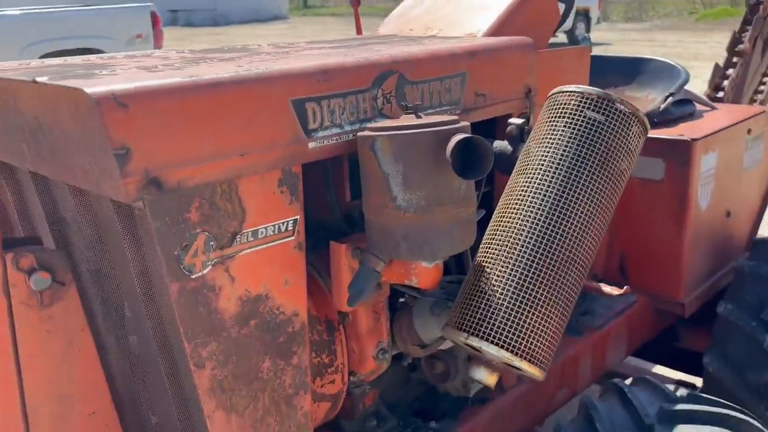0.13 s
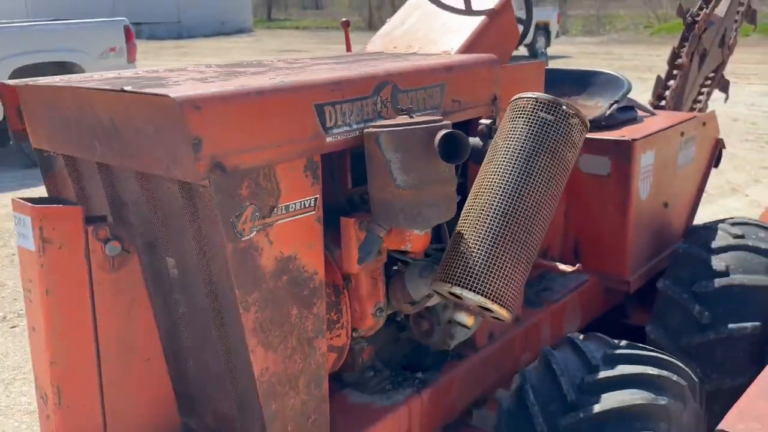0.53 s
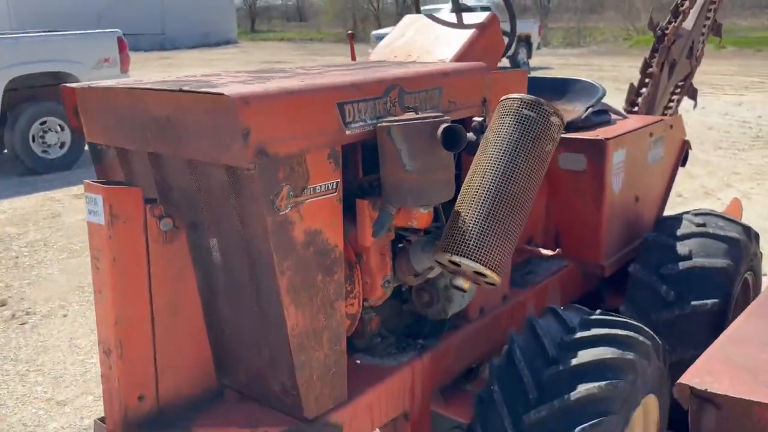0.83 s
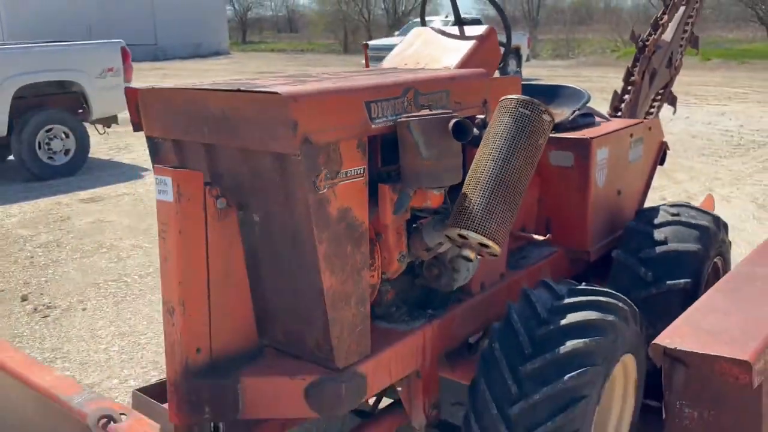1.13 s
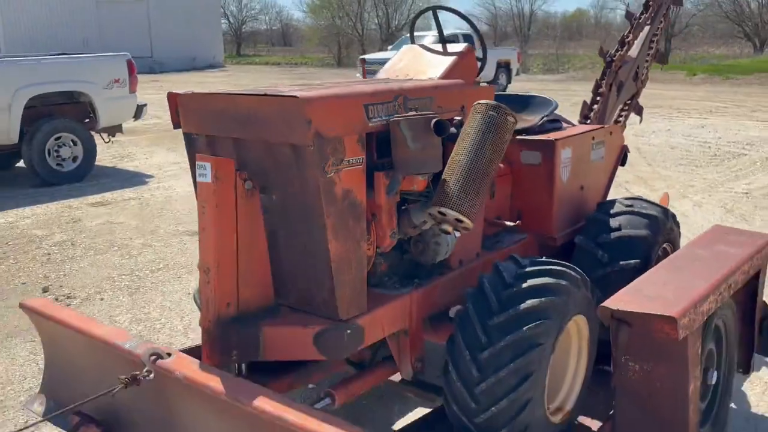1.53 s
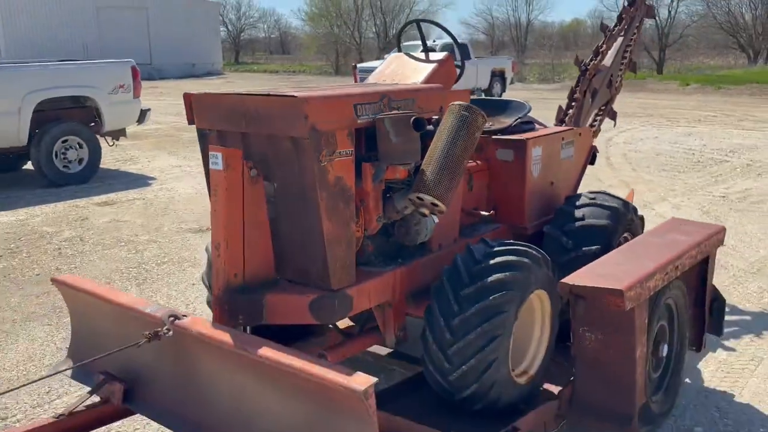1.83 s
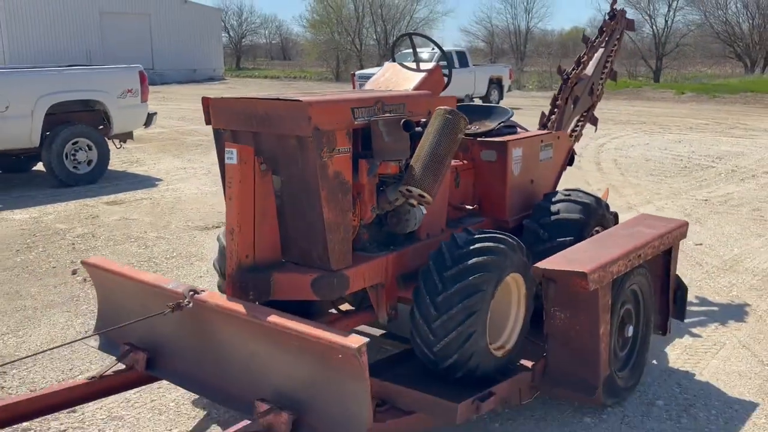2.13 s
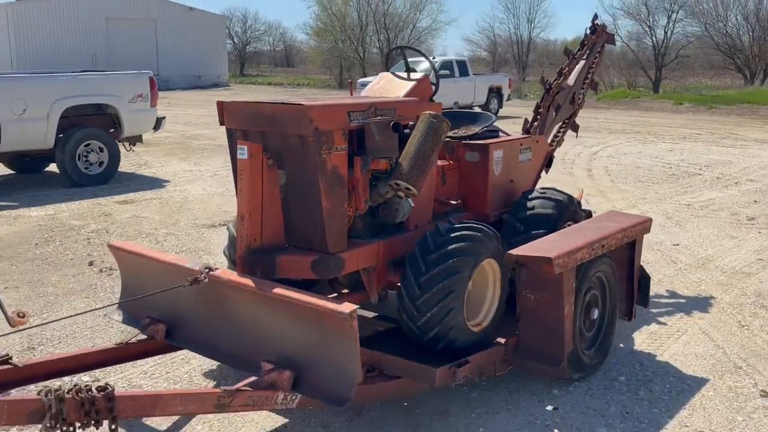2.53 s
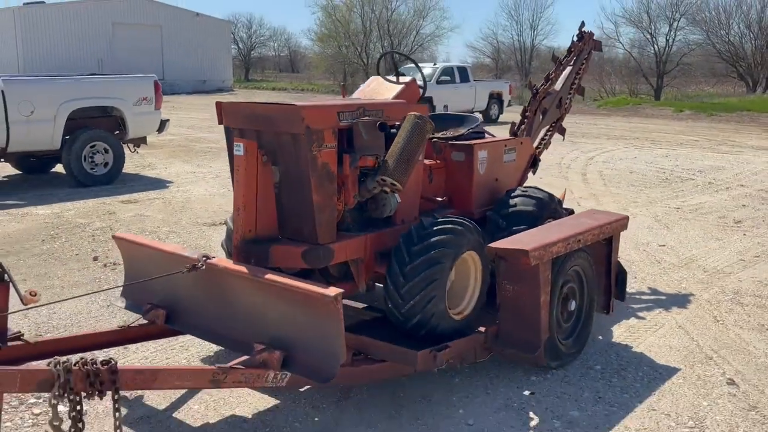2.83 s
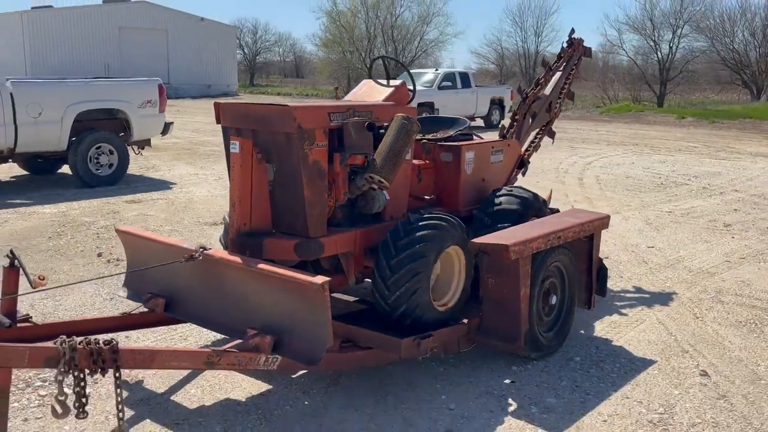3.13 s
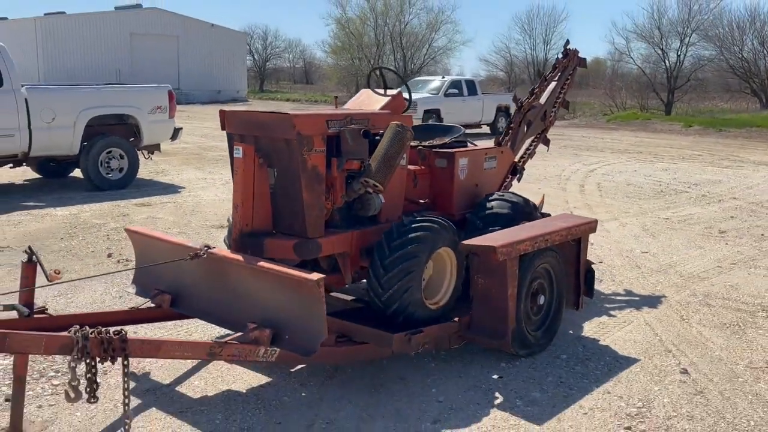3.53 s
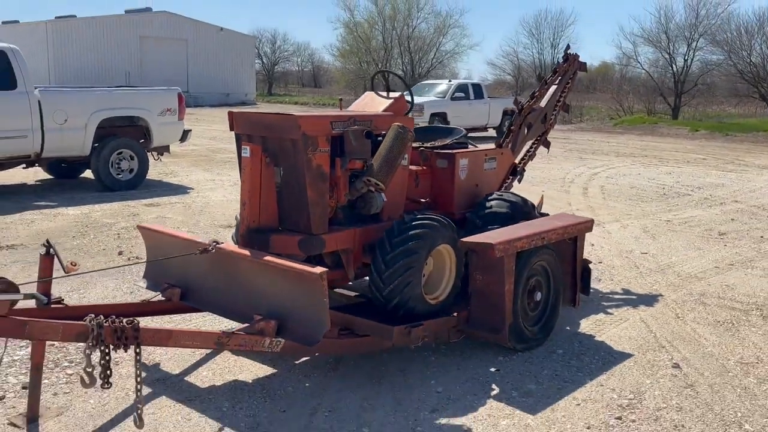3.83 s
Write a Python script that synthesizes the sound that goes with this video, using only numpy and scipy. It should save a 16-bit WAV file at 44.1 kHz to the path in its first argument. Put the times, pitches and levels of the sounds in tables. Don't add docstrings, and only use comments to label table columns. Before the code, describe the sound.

A four-cylinder petrol engine idles with clattering valves and puffing exhaust, fading amid wind buffeting

```python
import sys
import numpy as np
from scipy import signal
from scipy.fft import rfft, irfft
from scipy.io import wavfile
from scipy.ndimage import uniform_filter1d

SR = 44100
rng = np.random.default_rng(int(sys.argv[2]) if len(sys.argv) > 2 else 0)


def put_to_file(sound):
    columns = np.atleast_2d(sound).T
    safe = np.clip(columns, -1, 1)
    whole_steps = np.round(safe * 32767)
    wavfile.write(sys.argv[1], SR, whole_steps.astype(np.int16))


def invert_db(level):
    return 10 ** (np.asarray(level, dtype=float) / 20)


N = 176400
CYCLE_HZ = 16.47


def evened(x):
    return x / np.sqrt(np.mean(x ** 2) + 1e-20)


def read(points, hz):
    f, value = np.transpose(points)
    return np.interp(np.log(hz + 1), np.log(f + 1), value)


def curve(points, column=1):
    rows = np.transpose(points)
    return np.interp(np.arange(N) / SR, rows[0], rows[column])


def add(mix, at, sound):
    mix[at:at + len(sound)] += sound


def noise(spectrum, count=3):
    patch_db = 1.62
    hz, _, z = signal.stft(rng.standard_normal((count, N)), SR, nperseg=512)
    luck = rng.standard_normal(z.shape[1:])
    patches = uniform_filter1d(luck, size=4, axis=0)
    patches = evened(uniform_filter1d(patches, size=8, axis=1))
    patchy = signal.istft(z * invert_db(patch_db * patches), SR, nperseg=512)[1][:, :N]
    colour = invert_db(read(spectrum, np.fft.rfftfreq(N, 1 / SR)))
    return evened(irfft(rfft(patchy) * colour, N))


def slow_noise(first, second):
    smooth = uniform_filter1d(rng.standard_normal(N), size=first)
    return evened(uniform_filter1d(smooth, size=second))


def resonate(x, hz, width):
    pole = np.exp((2j * np.pi * hz - np.pi * width) / SR)
    return 2 * signal.lfilter([1 - abs(pole)], [1, -pole], x).real


# frequency in Hz, phase in rad.
PORT_PHASE = [(0, 0), (2070, .4), (2670, 1.3), (3360, .5), (4400, 0), (5510, -.7), (6600, -.1), (7100, 0)]
# frequency in Hz, left over right in dB.
PORT_BALANCE = [(60, 0), (290, -.4), (630, -1.5), (1390, -3.2), (3040, 1), (5500, 1.4), (8000, 0),
                (16000, 0)]
# frequency in Hz, level in dB.
APART = [(60, -8), (1000, -7), (3000, -6), (5500, -6), (6800, -9), (16000, -7.5)]


def ports(three):
    turn_from_hz, half_turn_hz = 7150, 2840
    three = np.pad(three, ((0, 0), (2048, 2048)), "reflect")
    hz = np.fft.rfftfreq(three.shape[1], 1 / SR)
    turn = read(PORT_PHASE, hz) - np.pi * np.maximum(hz - turn_from_hz, 0) / half_turn_hz
    half = np.exp(.5j * turn) * invert_db(read(PORT_BALANCE, hz) / 2)
    z = rfft(three)
    shared = z[0] * np.array([half, 1 / half])
    return irfft(shared + invert_db(read(APART, hz)) * z[1:], three.shape[1])[:, 2048:-2048]


# time in seconds,
# peak in dB, pitch in Hz.
BUFFETS = [(0.007, -7, 136), (0.032, -6.5, 163), (0.055, -13, 145), (0.096, -8.5, 195), (0.123, -3, 140),
           (0.163, -5.5, 126), (0.188, -5.5, 96), (0.228, -15, 183), (0.281, -14, 160), (0.359, -8, 131),
           (0.469, -19, 145), (0.483, -14.1, 154), (0.542, -6.5, 172), (0.584, -8, 215),
           (0.607, -12.6, 118), (0.628, -10, 144), (0.654, -13, 112), (0.715, -21, 135),
           (0.816, -14.3, 156), (0.831, -12.5, 127), (0.855, -11, 143), (0.895, -9, 166), (0.952, -22, 160),
           (0.992, -12.5, 91), (1.133, -10.3, 127), (1.159, -14.4, 104), (1.196, -16, 120),
           (1.216, -9, 100), (1.26, -8, 158), (1.301, -5, 149), (1.445, -11, 133), (1.517, -16, 195),
           (1.553, -15.1, 126), (1.622, -20, 113), (1.791, -12, 126), (1.854, -17.5, 144),
           (1.868, -13.5, 123), (2.071, -14, 113), (2.114, -22.5, 113), (2.186, -12, 129), (2.23, -21, 148),
           (2.25, -14, 143), (2.301, -11.5, 96), (2.316, -14, 137), (2.401, -20, 126), (2.5, -9.5, 105),
           (2.532, -14, 125), (2.561, -11.5, 117), (2.576, -20, 128), (2.597, -7, 132), (2.764, -9.5, 137),
           (2.781, -15.5, 126), (2.838, -18, 131), (2.878, -16.5, 174), (3.07, -15, 335), (3.099, -14, 318),
           (3.142, -16.5, 177), (3.57, -21, 291), (3.749, -22.5, 141), (3.993, -22.5, 134)]


def buffets():
    cycles, level_db, lull_depth = 2.14, -1, .8
    slaps, near = np.zeros((2, N + 6000))
    t = np.arange(-1500, 1500) / SR
    for s, db, hz in BUFFETS:
        shape = np.exp(-(t * hz / cycles * 3) ** 2)
        add(slaps, round(s * SR), invert_db(db + level_db) * shape * np.cos(2 * np.pi * hz * t))
        add(near, round(s * SR), shape)
    lull = 1 - lull_depth * np.minimum(near[1500:N + 1500], 1)
    return slaps[1500:N + 1500], lull


# start in seconds, length in seconds, level in dB, pitch in Hz.
PATS = [
    (3.052, 0.028, -23, 387),
    (3.076, 0.03, -27.5, 430),
    (3.111, 0.06, -35, 300),
    (3.21, 0.09, -32.5, 483),
    (3.264, 0.044, -35.5, 310),
    (2.899, .12, -33, 300),
    (3.371, 0.0149, -30.5, 300),
    (3.556, 0.026, -32.5, 450),
    (3.599, 0.031, -33, 600),
    (3.77, 0.13, -34, 825),
]


def port_puffs():
    out = np.zeros((3, N))
    for s, length, db, hz in PATS:
        at, count = round(s * SR), round(length * SR)
        breath = resonate(rng.standard_normal((3, 9000)), hz, 0.5 * hz)
        breath = evened(resonate(breath, hz, 0.74 * hz))[:, -count:]
        rise_and_fall = np.sin(np.pi * (np.arange(count) / count) ** 0.6)
        out[:, at:at + count] += invert_db(db) * breath * rise_and_fall
    return out


# time in seconds, level in dB.
GUST = [(0, -11.5), (.17, -17), (.4, -18), (.75, -22), (1.3, -21.5), (1.55, -22.5), (1.9, -29),
        (2.15, -23.5), (2.3, -20.5), (2.6, -24), (2.8, -24), (2.9, -30), (3.3, -30.5), (3.5, -33),
        (3.9, -32), (4, -27.5)]
# frequency in Hz, level in dB per Hz.
WIND = [(20, -42), (35, -17.5), (65, 1), (120, -1.5), (200, -7.5), (330, -13), (600, -24.5), (1500, -78)]
# time in seconds, level in dB.
FLUTTER_LEFT = [(0, -0.5), (3.3, 0), (3.45, -4), (3.62, -2), (3.7, -13), (4, -21)]


def wind():
    lump_db, flutter_hz = 2, 192
    stir_db, stir_ms, stir_reach_s = 4, 39, 2.2
    lumps = slow_noise(1200, 900)
    slaps, lull = buffets()
    t = np.arange(N) / SR
    beat = np.cos(2 * np.pi * CYCLE_HZ * (t - stir_ms / 1000))
    air = noise(WIND) * invert_db(stir_db * np.maximum(1 - t / stir_reach_s, 0) * beat)
    low = irfft(rfft(air) / (1 + (np.fft.rfftfreq(N, 1 / SR) / flutter_hz) ** 6), N)
    rumble = low + invert_db(curve(FLUTTER_LEFT)) * (air - low)
    strength = invert_db(curve(GUST) - 0.5 + lump_db * lumps)
    return strength * rumble * lull + slaps * [[1], [.25], [-.25]] + port_puffs()


# time in seconds, lag in ms.
LAG = [(0, 0.46), (.6, -0.35), (1.05, -0.95), (1.8, 1.87), (2.6, 1.21), (3.0, 0.56), (4, -0.68)]


def train(ms, db, spread_db, jitter_s):
    luck = np.clip(rng.standard_normal((70, 2)), -1.6, 1.6)
    s = np.arange(70) / CYCLE_HZ + ms / 1000
    s = s + np.interp(s, *np.transpose(LAG)) / 1000 + jitter_s * luck[:, 0]
    at, out = np.round(s * SR).astype(int), np.zeros(N)
    heard = at < N
    out[at[heard]] = invert_db(db + spread_db * luck[:, 1])[heard]
    return out


# ms into the cycle, then knock, hiss and sizzle in dB over the steady noise.
VALVES = [
    (7.53, 1.5, -11, 2),
    (18.9, -4, 5, 8),
    (24.02, -3, -7.5, -6),
    (38.47, 1, -15, -4),
    (45.72, -6, -19, -14),
    (51.6, -5, -8, 3.5),
]


def valve_gate(column, tau_s):
    spread_db = 1.5
    clicks = sum(train(row[0], 2 * row[column], 2 * spread_db, 0.00031) for row in VALVES)
    u = np.arange(2000) / SR / tau_s
    burst = 8 * u * np.exp(-2 * np.sqrt(u) - u / 2)
    return evened(np.sqrt(1 + abs(signal.oaconvolve(clicks, burst)[:N])))


# time in seconds, engine body level in dB.
AWAY = [(0, -24), (.5, -26.5), (1.0, -29), (1.6, -30.5), (2.2, -33), (3, -34), (4, -36)]
# frequency in Hz, level in dB per Hz.
ROAR = [(60, -22), (300, -5.5), (500, -3.5), (1100, 0), (2400, -9), (2800, -17), (5000, -18), (9000, -66)]
# frequency in Hz, level in dB per Hz.
HISS = [(1000, -2.5), (2500, -4.5), (4000, -2), (5200, -7.5), (6500, -4), (8200, -11), (11000, -13.5),
        (16000, -42)]
# frequency in Hz, level in dB per Hz.
SIZZLE = [(4000, -11), (7000, -17.5), (9500, -0.5), (12000, -7), (16000, -4.5)]
# frequency in Hz, width in Hz, level in dB.
PANELS = [(513, 117, -9.5), (693, 17, -13), (819.5, 42, -15), (1120, 64, -12.5), (1490, 21, -16),
          (1950, 410, -11)]
# time in seconds, level in dB.
WHISTLE = [(0, -64), (1.2, -69), (1.5, -53), (2.1, -54.5), (2.8, -64), (4, -66)]


def casing():
    roar_db, hiss_db, sizzle_db, flutter_db = 1.5, -9.4, -13, .8
    hiss_follows = 0.93
    raw = rng.standard_normal((3, N))
    away = curve(AWAY)
    roar = noise(ROAR) + sum(invert_db(db) * evened(resonate(raw, hz, width)) for hz, width, db in PANELS)
    roar = invert_db(away + roar_db) * evened(roar) * valve_gate(column=1, tau_s=0.0081)
    spit = valve_gate(column=2, tau_s=0.0046)
    hiss_away = away[0] + hiss_follows * (away - away[0])
    hiss = invert_db(hiss_away + hiss_db) * noise(HISS) * spit
    whistle = invert_db(curve(WHISTLE)) * evened(resonate(raw, hz=7980, width=170)) * spit
    sizzle = invert_db(away + sizzle_db) * noise(SIZZLE) * valve_gate(column=3, tau_s=.003)
    flutter = slow_noise(3000, 2000)
    return roar + (hiss + sizzle + whistle) * invert_db(flutter_db * flutter)


def valve_knocks():
    return sum(rng.choice([-1., 1.]) * train(row[0], row[1], 3.3, .00004) for row in VALVES)


# frequency in Hz, ring width in Hz, level in dB.
CASTINGS = [(504.6, 16, -18), (557, 30, -27), (674, 24, -18.5), (807, 29, -14), (1125, 91, -15),
            (1555, 170, -22), (1790, 100, -20.5)]


def clatter():
    out = np.zeros((3, N))
    for k, (hz, width, db) in enumerate(CASTINGS):
        out[[0, 1 + k % 2]] += invert_db(db) * evened(resonate(valve_knocks(), hz, width))
    return invert_db(curve(AWAY)) * out


def accents(events, sound, db, tau_s):
    clicks, u = np.zeros(N), np.arange(2000) / SR / tau_s
    for s, peak_db in events:
        clicks[round(s * SR)] = invert_db(peak_db + db)
    return sound * signal.oaconvolve(clicks, np.minimum(6 * u, 1) * np.exp(-u))[:N]


# time in seconds, peak in dB.
TICKS = [(0.0697, -24), (0.1106, -28), (0.16, -25), (0.2009, -30), (0.2339, -28), (0.3206, -18),
         (0.3825, -28), (0.416, -25), (0.4504, -29), (0.5038, -28), (0.5377, -22), (0.599, -16),
         (0.7402, -26), (0.7826, -22), (0.8689, -29), (0.9208, -28), (0.989, -27), (1.051, -26),
         (1.1124, -17), (1.1667, -20), (1.2376, -26), (1.4157, -27.5), (1.4785, -27), (1.5978, -33),
         (1.6581, -24), (1.9639, -28), (2.0238, -31), (2.0852, -26), (2.2064, -27), (2.2672, -23),
         (3.0545, -27), (3.1752, -32), (3.2969, -31), (3.6381, -31), (3.8422, -29), (3.903, -23)]
# time in seconds, peak in dB.
RAPS = [(0.043, -15), (0.103, -17), (0.189, -15), (0.233, -12), (0.345, -15), (0.4, -18), (0.432, -12.5),
        (0.462, -10), (0.521, -11), (0.613, -15), (0.642, -18), (0.674, -14), (0.707, -12), (0.738, -20),
        (0.857, -19), (0.917, -19.5), (1.067, -18), (1.258, -15), (1.416, -11), (1.495, -21), (1.774, -15),
        (1.833, -20), (2.316, -18), (2.548, -19)]


def loose_parts():
    bright = noise(HISS[2:]) + .5 * noise(SIZZLE)
    ticks = accents(TICKS, bright, db=-8, tau_s=0.0044)
    return ticks + accents(RAPS, noise(ROAR), db=-9, tau_s=0.0077)


# time in seconds, pipe ring in dB, low boom in dB.
MOUTH = [(0, -16, -20), (.6, -18.5, -30.5), (1.1, -22.5, -20.5), (1.8, -29, -19), (2.7, -30.5, -22.5),
         (2.95, -51, -33), (3.6, -50, -51), (4, -51, -37)]


def tailpipe():
    level = invert_db(curve(MOUTH, column=2) + curve(FLUTTER_LEFT) - 14)
    return level * evened(resonate(valve_knocks(), hz=280, width=36)) * [[1], [0], [0]]


def swell(tau_s):
    u = np.arange(3000) / SR / tau_s
    return u ** 5 * np.exp(-u)


# peak in ms into the cycle, pipe ring in dB, low boom in dB.
PUFFS = [
    (4.13, -32.5, -3),
    (15.74, -16, -6.5),
    (30.1, 3.5, 9.5),
    (44.3, 2.4, -6.5),
    (55.13, -10.5, 9.5),
]


def exhaust():
    ring_hz, ring_s, boom_hz, boom_s, boom_level_db = 172, 0.0015, 80.5, 0.002, -8
    t, out = np.arange(3000) / SR, np.zeros((2, N))
    for ms, ring_db, boom_db in PUFFS:
        clicks = train(ms, 0, spread_db=1.0, jitter_s=.0002)
        modes = (ring_db, ring_hz, ring_s), (boom_db, boom_hz, boom_s)
        for k, (db, hz, tau) in enumerate(modes):
            early = round(5 * tau * SR)
            pulse = swell(tau) * np.cos(2 * np.pi * hz * (t - early / SR))
            out[k, :N - early] += invert_db(db) * signal.oaconvolve(clicks, pulse)[early:N]
    ring = invert_db(curve(MOUTH)) * evened(out[0])
    boom = invert_db(curve(MOUTH, column=2) + boom_level_db) * evened(out[1])
    return (ring + boom) * np.ones((2, 1))


def scene():
    return ports(wind() + casing() + clatter() + loose_parts() + tailpipe()) + exhaust()


def roll_off(x):
    return signal.sosfilt(signal.butter(12, 15900, fs=SR, output="sos"), x)


def record(dry):
    ceiling = .95
    mix = signal.sosfilt(signal.butter(3, 38, "high", fs=SR, output="sos"), dry)
    mix = mix / (1 + abs(mix / ceiling) ** 6) ** (1 / 6)
    return roll_off(mix)


dry = scene()
out = record(dry)
put_to_file(out)
```